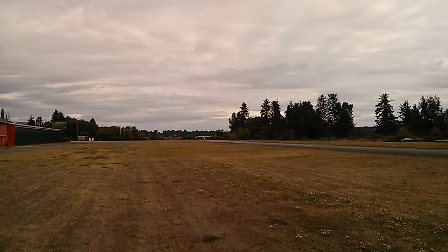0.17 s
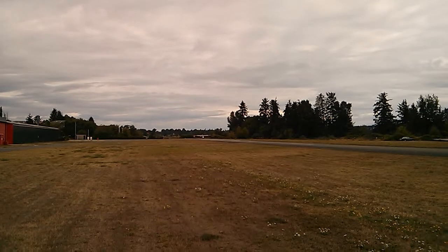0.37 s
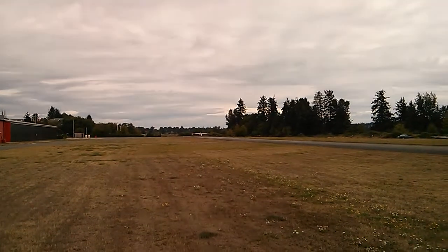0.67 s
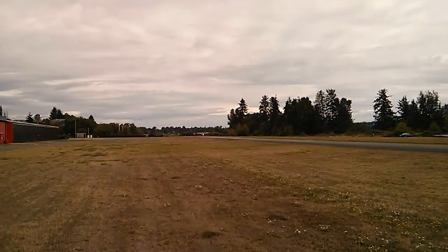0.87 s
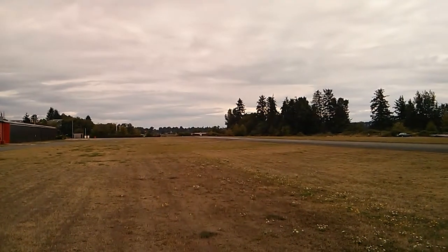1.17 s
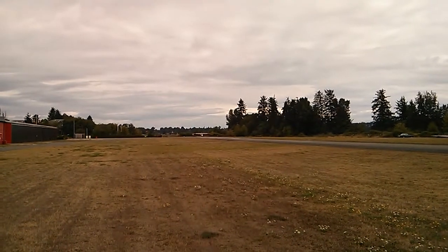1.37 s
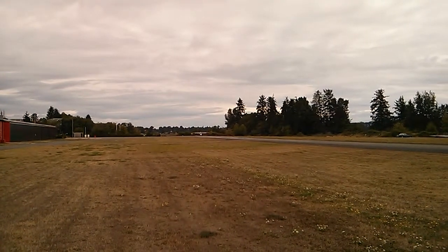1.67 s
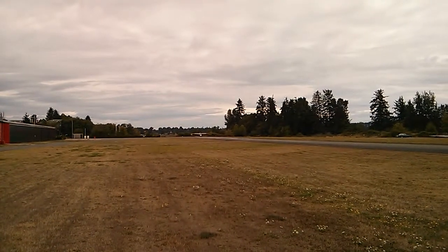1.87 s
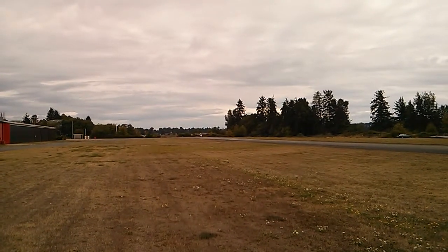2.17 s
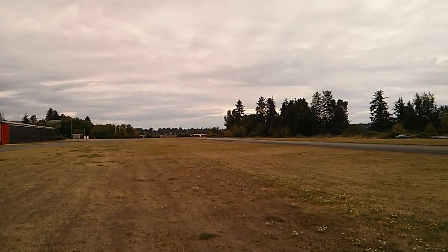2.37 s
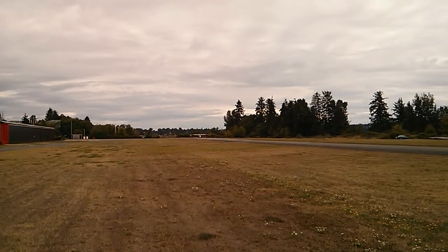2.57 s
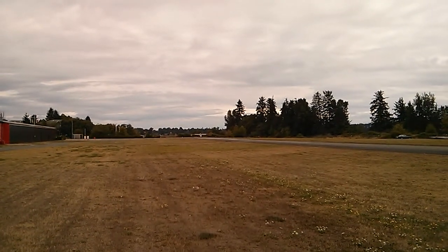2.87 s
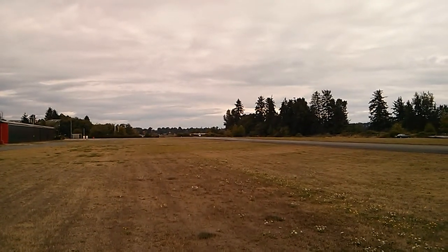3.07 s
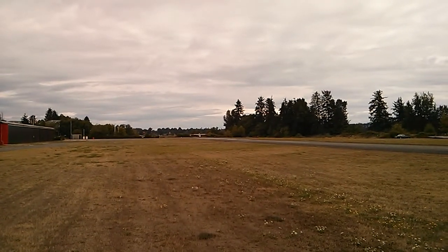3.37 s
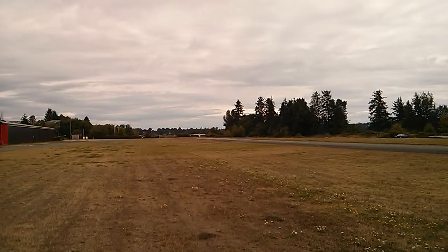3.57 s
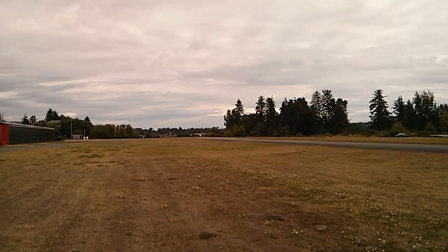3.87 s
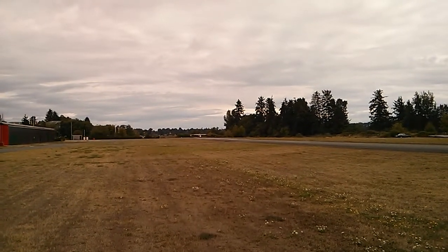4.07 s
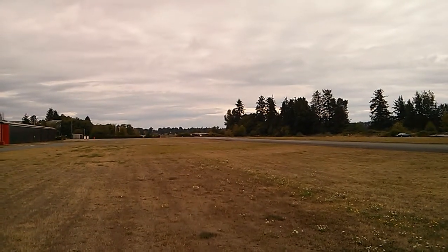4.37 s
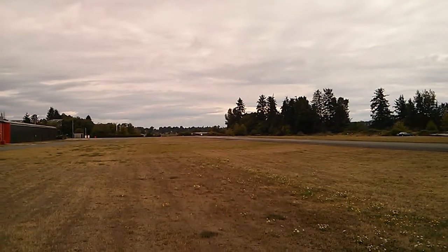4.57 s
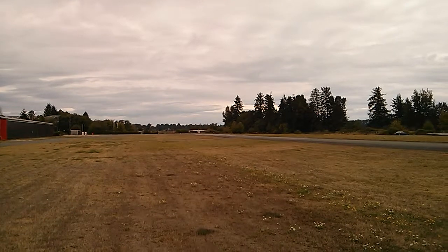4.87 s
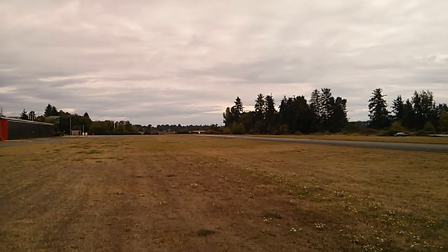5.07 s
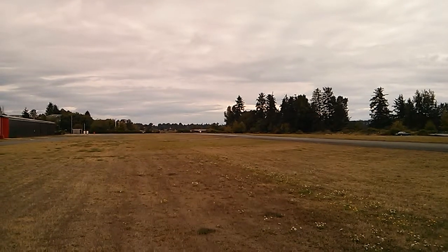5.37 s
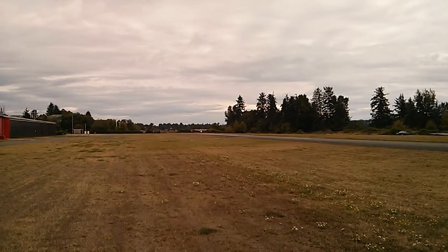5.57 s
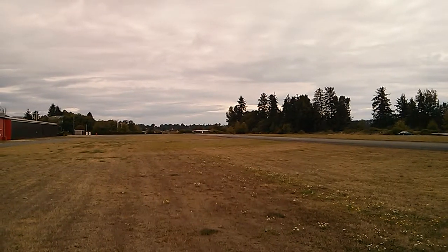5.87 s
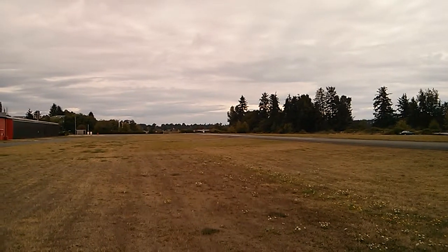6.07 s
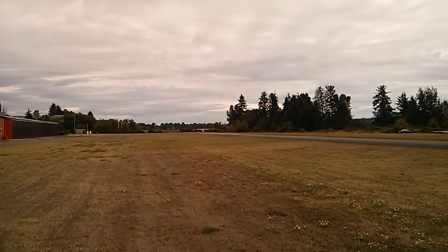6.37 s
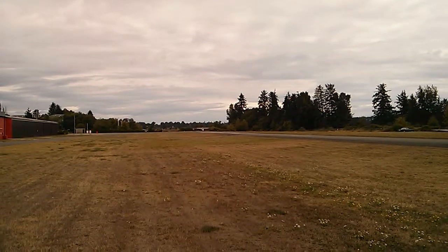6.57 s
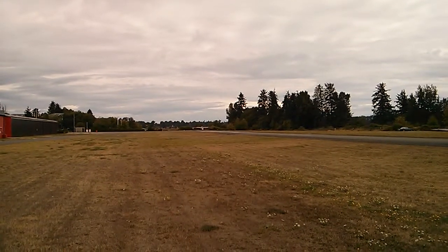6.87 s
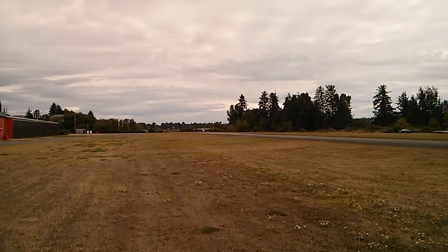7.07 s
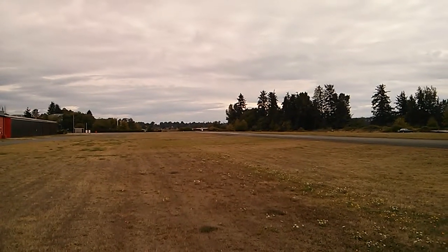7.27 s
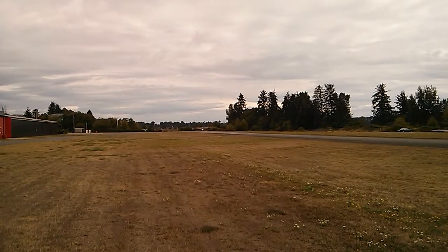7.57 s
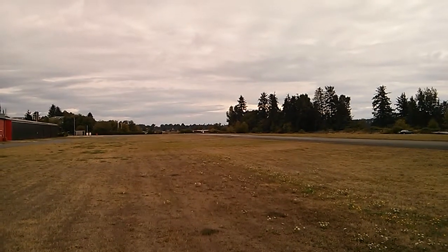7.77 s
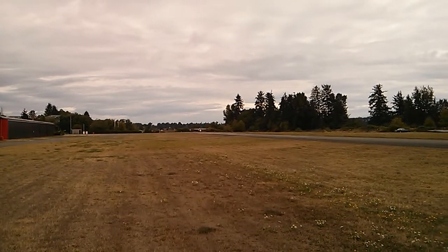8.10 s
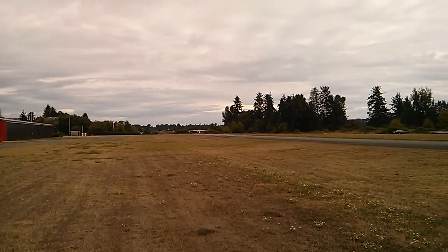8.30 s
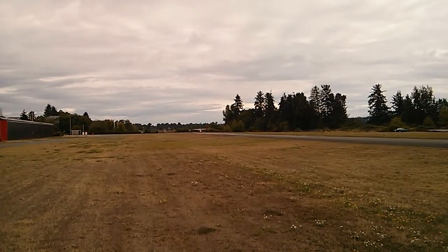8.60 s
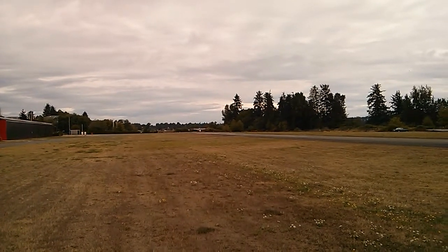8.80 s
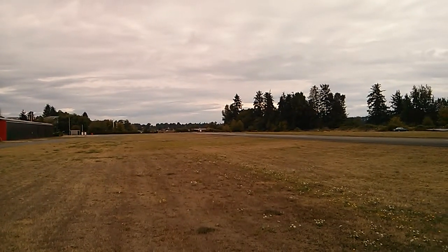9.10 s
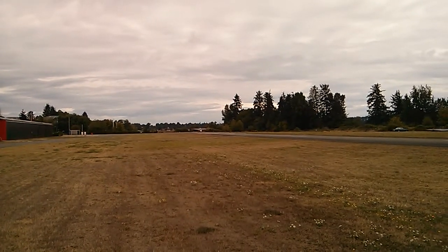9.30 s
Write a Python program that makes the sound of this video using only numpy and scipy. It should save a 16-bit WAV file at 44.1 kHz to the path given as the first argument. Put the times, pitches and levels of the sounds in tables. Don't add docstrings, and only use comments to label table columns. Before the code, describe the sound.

A small propeller aircraft idles unevenly on a grass airfield as crickets chirp, then its engine revs up to a loud, slapping full-power roar.

```python
import sys
import numpy as np
from scipy import signal
from scipy.fft import rfft, irfft, next_fast_len
from scipy.io import wavfile
from scipy.ndimage import uniform_filter1d

SR = 44100
rng = np.random.default_rng(int(sys.argv[2]) if len(sys.argv) > 2 else 0)


def dump_mix(stems):
    frames = np.atleast_2d(stems).T
    limited = np.clip(frames, -1, 1)
    pcm = np.round(limited * 32767).astype(np.int16)
    wavfile.write(sys.argv[1], SR, pcm)


def level_to_linear(level):
    exponent = np.asarray(level, float) / 20
    return 10 ** exponent


N = 416304
GEAR = .3846

# (time [s], firing rate [Hz])
SPEED = [(0.0, 58.4), (1.0, 61.1), (2.0, 59.1), (3.2, 60.8), (3.9, 59.8), (4.58, 61.2), (5.13, 77.5),
         (5.28, 80.1), (5.73, 93.5), (6.17, 103.8), (6.48, 120.8), (7.23, 158.6), (7.68, 194.5),
         (7.83, 201.8), (7.98, 205.9), (8.3, 209.9), (8.65, 211.0), (9.44, 211.7)]
# (firing rate [Hz], roar [dB], tip hiss [dB], fin ring [dB], rumble against the tones [dB])
SLIPSTREAM = [(57.4, -62.5, -86.5, -92, -7), (76.7, -57.5, -69.5, -64, -0.5),
              (95.3, -57.5, -70, -60.5, -14), (100, -52, -67, -60, -5.5), (115.4, -46.5, -61.5, -64, -9),
              (143, -41.5, -53, -58, -5), (165, -38, -48, -51, -9), (183, -34, -44.5, -52, -8.5),
              (202, -32.5, -42.5, -66, -24), (208.5, -32, -42, -50.5, -12)]
# (frequency [Hz], level [dB])
SLAP_COLOUR = [(260, -9), (450, -1.5), (486, -10), (639, 7.5), (740, 11), (907, 6.5), (1010, 3), (1290, 11),
               (1380, 6), (1470, 1.5), (1800, 4.5), (2070, -3.5), (2400, -12), (3120, -47), (5280, -120)]


def evened(x):
    return x / np.sqrt(np.mean(x ** 2) + 1e-20)


def read(points, hz):
    f, value = np.transpose(points)
    return np.interp(np.log(hz + 1), np.log(f + 1), value)


def curves(rows):
    s, *columns = np.transpose(rows)
    return [np.interp(np.arange(N) / SR, s, c) for c in columns]


def at_speed(rows, hz):
    speed, *columns = np.transpose(rows)
    return [np.interp(hz, speed, c) for c in columns]


def drift(hz, first=0):
    low_pass = signal.butter(2, hz, fs=SR / 64, output="sos")
    steps = evened(signal.sosfilt(low_pass, rng.standard_normal(N // 64 + 2)))
    return np.interp(np.arange(first, N) / 64, np.arange(len(steps)), steps)


def noise(colour, patchy_db, swell_db, size=1024):
    hop = size // 4
    frames, hz = N // hop + 5, np.fft.rfftfreq(size, 1 / SR)
    a, b, patches = rng.standard_normal((frames, len(hz), 3)).T
    patches = uniform_filter1d(patches, size=size // 100, axis=0)
    patches = evened(uniform_filter1d(patches, size=3000 // hop, axis=1))
    inside = (hz > colour[0][0]) & (hz < colour[-1][0])
    gain = level_to_linear(read(colour, hz)[:, None] + patchy_db * patches) * inside[:, None]
    rush = signal.istft((a + 1j * b) * gain, nperseg=size, noverlap=size - hop)[1][:N]
    return evened(rush) * level_to_linear(swell_db * drift(5.3))


def resonate(x, hz, width):
    r = np.exp(-np.pi * width / SR)
    return signal.lfilter([1 - r, 0, r - 1], [1, -2 * r * np.cos(2 * np.pi * hz / SR), r * r], x)


def ring(x, hz, width):
    return resonate(resonate(x, hz, width * 1.3), hz, width * 1.3)


def tone(turns, db, waver_db):
    return np.sqrt(2) * level_to_linear(db + waver_db * drift(13.6)) * np.cos(2 * np.pi * (turns + rng.random()))


def exhaust(turns, hz, first_db, second_db, third_db):
    # (multiple of the firing rate, level against the third [dB])
    upper_orders = [(4, -21.5), (5, -15.5)]
    # (frequency [Hz], gain [dB])
    muffler = [(40, -4), (310, 1), (350, -8), (500, -30)]
    orders = [(1, first_db), (2, second_db), (3, third_db)]
    orders += [(k, third_db + db + read(muffler, k * hz)) for k, db in upper_orders]
    return sum(tone(k * turns, db, waver_db=3.0) for k, db in orders)


def propeller(turns, hz, thump_db):
    # (multiple of the blade rate, level [dB])
    thump_orders = [(1, -6.5), (2, -1), (3, -11.5), (4, -16.5)]
    # (multiple of the firing rate, added multiple of the blade rate, level [dB])
    chopped_orders = [(.5, 0, -17), (.5, 1, -16.5), (.5, 2, -19.5), (1, 1, -14), (2.5, 0, -23.5)]
    blades = GEAR * turns
    thump = sum(tone(k * blades, thump_db + db, waver_db=2.0) for k, db in thump_orders)
    chopped = sum(tone(m * turns + k * blades, thump_db + db, waver_db=2.0) for m, k, db in chopped_orders)
    return thump + chopped + slap(blades, hz)


def rumble(level_db):
    # (frequency [Hz], level per Hz [dB])
    rumble_colour = [(25, -25), (50, -17), (80, 2), (150, 4), (220, -7), (300, -9), (350, -24.5),
                     (480, -43)]
    return level_to_linear(level_db) * noise(rumble_colour, patchy_db=2.4, swell_db=.6, size=4096)


def roar(hz, beat, level_db):
    # (frequency [Hz], level per Hz [dB])
    roar_colour = [(220, 11), (380, -9.5), (481, -13), (619, -0.5), (720, 5.5), (797, -13), (926, 7.5),
                   (1080, -7), (1260, 6.5), (1350, 0), (1500, -17.5), (1740, -12.5), (1940, -7.5),
                   (2350, -26), (2500, -51), (3250, -9), (5500, -120)]
    tips = np.clip((hz - 140) / 40, 0, 1)
    slow = np.sqrt(1 - tips) * noise(roar_colour[:-2], patchy_db=1.2, swell_db=.5)
    fast = np.sqrt(tips) * noise(SLAP_COLOUR, patchy_db=.8, swell_db=.2)
    return (slow + fast) * (1 + 0.45 * beat) * level_to_linear(level_db - 5.0 - 3.6 * tips)


def tip_hiss(hz, beat, level_db):
    # (frequency [Hz], level per Hz [dB])
    light_colour = [(1350, -48), (2300, -36), (2390, -13.5), (2950, -7), (3540, -11.5), (3930, -2),
                    (4580, -17.5), (4840, -30), (5380, -2), (5820, -10.5), (6730, -9), (14500, -25.5),
                    (16600, -31)]
    # (frequency [Hz], level per Hz [dB])
    full_colour = [(1350, -34), (2300, -49), (2470, -20), (2970, -2.5), (3190, -18), (3320, -11),
                   (3600, -7.5), (4090, -2.5), (4960, -5), (5330, -1.5), (6110, 3), (7900, -12.5),
                   (9420, -14), (11100, -35.5), (15600, -45)]
    # (frequency [Hz], width [Hz], level [dB])
    panel_modes = [(2660, 130, -11), (3066, 100, -9), (3327, 71, -4), (5490, 49, -5), (5990, 360, -1.5),
                   (8050, 86, -26)]
    power = np.clip((hz - 104) / 36, 0, 1)
    light = np.sqrt(1 - power) * noise(light_colour, patchy_db=3.5, swell_db=0.3, size=512)
    full = np.sqrt(power) * noise(full_colour, patchy_db=1.1, swell_db=0.57, size=512)
    gusts = rng.standard_normal((len(panel_modes), N))
    panels = evened(sum(level_to_linear(db) * evened(ring(gust, f, width))
                        for gust, (f, width, db) in zip(gusts, panel_modes)))
    return level_to_linear(level_db) * (light + full + level_to_linear(-11) * np.sqrt(power) * panels) * (1 + 0.23 * beat)


def cooling_fins(turns, level_db):
    # (frequency [Hz], width [Hz], level [dB])
    fin_modes = [(5500, 74, 3), (5265, 260, -0.5), (5940, 140, -11)]
    blows = level_to_linear(2.1 * np.clip(rng.standard_normal(N), -2, 2) + 2.4 * drift(2.4))
    knocks = np.diff(np.floor(turns), prepend=0) * blows + 0.022 * rng.standard_normal(N)
    fins = evened(sum(level_to_linear(db) * evened(ring(knocks, f, width)) for f, width, db in fin_modes))
    return level_to_linear(level_db - 4.5) * fins


def airflow(turns, hz, tones_db, effort_db):
    # (level [dB], ..)
    gust_sizes = (0.58, 0.4, 1.9, 2.8)
    gusty = [db + size_db * drift(7.2) for db, size_db in zip(at_speed(SLIPSTREAM, hz), gust_sizes)]
    roar_db, hiss_db, fins_db, rumble_db = gusty
    roar_db = roar_db + 0.42 * effort_db
    beat = uniform_filter1d(2 * np.exp(-3.0 * (GEAR * turns % 1)) - .6, size=60)
    air = rumble(tones_db + rumble_db) + roar(hz, beat, roar_db) + tip_hiss(hz, beat, hiss_db)
    return air + cooling_fins(turns, fins_db)


def idle_rush():
    # (frequency [Hz], level per Hz [dB])
    idle_colour = [(190, -69), (330, -13), (365, -55), (433, -0.5), (508, -32.5), (655, 9), (797, -44),
                   (838, -7), (889, 19), (936, -6), (1040, -54), (1220, -7), (1580, -9.5), (1840, -4),
                   (2500, -27.5), (3250, -45), (5500, -120)]
    return level_to_linear(-65.5) * noise(idle_colour[:-2], patchy_db=1.6, swell_db=.7)


def aircraft():
    # (time [s], level [dB])
    effort = [(0.0, 1), (0.45, -2.5), (0.95, 1), (1.45, -0.5), (1.9, 1.2), (2.4, 0.2), (3.2, 0.7),
              (3.9, 0.8), (4.55, 1.5), (4.9, -3.2), (5.36, 1.5), (5.6, 2.5), (5.9, -0.5), (6.5, 1.2),
              (7.4, -2.5), (8.0, -0.1), (8.8, -1.2), (9.44, 1.7)]
    # (time [s], half length [s], level [dB])
    misfires = [
        (0.008, 0.04, -3),
        (0.268, .06, -5.5),
        (0.502, 0.032, -1.5),
        (1.28, 0.021, -15),
        (1.684, 0.019, -17),
        (1.93, 0.07, -4),
        (4.708, 0.04, -6),
        (5.536, 0.038, -12),
    ]
    # (firing rate [Hz], exhaust order 1 [dB], order 2 [dB], order 3 [dB], propeller thump [dB])
    engine = [(66, -66, -57.5, -54.5, -70), (68.4, -75, -53.5, -50, -74), (70.7, -65, -47.5, -59.5, -67),
              (92.2, -58.5, -47.5, -60.5, -69), (96.5, -70.5, -56, -62.5, -66), (120, -60, -53, -75.5, -60),
              (134, -44.5, -51, -85, -56.5), (159.4, -35.5, -47, -65, -42), (201, -30, -51.5, -52, -33),
              (205.4, -33.5, -53, -39, -34), (210, -37, -49, -81, -38.5)]
    (hz,), (effort_db,) = curves(SPEED), curves(effort)
    t = np.arange(N) / SR
    effort_db = effort_db + sum(db * np.exp(-((t - s) / half) ** 2) for s, half, db in misfires)
    levels = [db + effort_db for db in at_speed(engine, hz)]
    first_db, second_db, third_db, thump_db = levels
    turns = np.cumsum(hz + .2 * drift(4)) / SR
    tones_db = 10 * np.log10(sum(level_to_linear(2 * db) for db in levels))
    direct = exhaust(turns, hz, first_db, second_db, third_db) + propeller(turns, hz, thump_db)
    direct += airflow(turns, hz, tones_db, effort_db) + idle_rush()
    return wall_echo(direct)


def field_hiss():
    # (frequency [Hz], level per Hz [dB])
    field_colour = [(1350, -39), (2300, -37), (2390, -5), (3490, -24), (4580, 4), (5210, -0.5),
                    (14700, -6.5), (15600, -6)]
    wash_db = 0.25 * np.maximum(at_speed(SLIPSTREAM, *curves(SPEED))[1] + 72, 0)
    return level_to_linear(-75.5 + wash_db) * noise(field_colour, patchy_db=2.0, swell_db=0.36, size=512)


def ticks():
    # (time [s], level [dB], frequency [Hz], decay [s])
    creaks = [
        (.04, -63, 6240, 0.024),
        (.253, -57, 8000, .002),
        (1.527, -60, 8500, .002),
        (2.037, -61, 7700, 0.036),
        (2.81, -67, 8040, .002),
        (3.32, -77, 9000, 0.061),
        (3.79, -63, 9000, .003),
        (4.095, -66, 7050, .003),
    ]
    # (time [s], level [dB])
    rattle = [(4.8832, -50), (4.9705, -51), (5.079, -46), (5.1316, -68), (5.2354, -47), (5.286, -44),
              (5.3465, -43), (5.398, -47), (5.4349, -46), (5.4793, -49), (5.5522, -76), (5.5981, -50)]
    out, t = np.zeros(N), np.arange(6000) / SR
    for s, db, hz, decay in creaks + [(s, db - 8, 5740, 0.019) for s, db in rattle]:
        burst = rng.standard_normal(len(t)) * np.exp(-t / decay) * np.minimum(t / decay * 4, 1)
        out[round(s * SR):][:len(t)] += level_to_linear(db) * (0.59 * ring(burst, hz, 3900) + 2.5 * ring(burst, hz, 600))
    return out


def wall_echo(direct):
    # (frequency [Hz], reflected share, negative is upside down)
    wall = [(40, -0.98), (350, -0.55), (600, 0.19), (2000, -0.33), (4000, -0.29)]
    delay_s = .0469
    size = next_fast_len(N + SR)
    f = np.fft.rfftfreq(size, 1 / SR)
    echo = read(wall, f) * np.exp(-2j * np.pi * f * delay_s)
    return irfft(rfft(direct, size) * (1 + echo), size)[:N]


def crickets():
    # (time [s], first to last stroke [s], peak level [dB])
    near_chirps = [(0.062, 0.11, -59), (.57, 0.096, -59.5), (1.064, .102, -59), (1.635, 0.099, -58.5),
                   (2.155, 0.097, -57.5), (2.625, .098, -58), (3.1993, 0.099, -58.5), (3.79, 0.095, -58.5),
                   (4.312, .1, -57.5), (4.884, 0.096, -58), (5.649, .096, -56), (6.274, .106, -58),
                   (6.715, .108, -55)]
    # (level [dB], frequency [Hz])
    wing_strokes = [(-6, 4460), (-0.8, 4560), (-0.1, 4570)]
    # (time [s], peak level [dB], frequency [Hz])
    far_chirps = [(0.3194, -69, 5500), (0.4294, -70, 5100), (0.5487, -67, 4670), (0.6, -69, 4540),
                  (0.7153, -68, 4890), (0.9592, -64, 4630), (1.0084, -68, 4640), (1.1164, -66, 4500),
                  (1.2126, -66, 5500), (1.3054, -70, 5450), (1.3478, -67, 5450), (1.8447, -70, 4600),
                  (1.935, -76, 4850), (1.9804, -64, 4880), (2.0428, -69, 4870), (2.7801, -68, 5040),
                  (3.3154, -69, 4970), (3.4394, -67, 4650), (3.5793, -72, 5430), (4.2787, -66, 4670),
                  (4.6249, -62.5, 4560), (4.6753, -64, 4710), (4.7212, -64, 5130), (5.5324, -70, 5460)]
    near, far = np.zeros((2, N + SR))
    strokes = [(far, *row, .026, .015) for row in far_chirps]
    for s, span, top_db in near_chirps:
        for late, (db, hz) in zip((0, .0455, span), wing_strokes):
            strokes.append((near, s + late, top_db + db, hz, .029, .1))
    for out, s, db, hz, length, sag in strokes:
        u = np.arange(0, 1.2, 1 / (length * SR))
        shape = np.sin(np.pi * (u / 1.17) ** 0.94) ** 2
        at = max(round((s + 0.013 - 0.81 * length) * SR), 0)
        pitch = hz * (1.012 - sag * u ** 3.4)
        out[at:at + len(u)] += level_to_linear(db) * shape * np.sin(2 * np.pi * np.cumsum(pitch) / SR)
    flutter = evened(0.92 + evened(uniform_filter1d(rng.standard_normal(N + SR), size=50)))
    tail = rng.standard_normal(12000) * level_to_linear(-60 * np.arange(12000) / SR / .5)
    smear = signal.oaconvolve((near + 1.4 * far) * flutter, tail / np.linalg.norm(tail))
    return (near + far * (0.33 + 0.53 * flutter) + level_to_linear(-7.5) * smear[:N + SR])[:N]


def slap(blades, hz):
    # (time [s], slap [dB], brightness [dB])
    tip_loading = [
        (6.7, -45, -8),
        (7.15, -47.5, .5),
        (7.32, -38, -1.4),
        (7.5, -37.5, 0),
        (7.7, -36.5, 0.5),
        (8.25, -35.5, -2.5),
        (8.6, -31.5, -7.5),
        (9.03, -38.5, 3.5),
        (9.44, -35.5, 4.5),
    ]
    level_db, bright_db = curves(tip_loading)
    start = round(6.93 * SR)
    hz, bright_db = hz[start:], bright_db[start:] - 1.5
    turns, rate = blades[start:], GEAR * hz
    below_free = np.maximum(216 - hz, 0)
    stack = np.zeros(len(turns))
    for k in range(6, 28):
        f = k * rate
        tilt_db = bright_db * np.clip((f - 1040) / 200, 0, 1)
        tilt_db += 0.1471 * below_free * np.exp(-((f - 1020) / 178) ** 2)
        waver_db = (2.5 + 0.028 * k) * drift(1.66, first=start)
        line_db = read(SLAP_COLOUR, f) + tilt_db - 1.4 * max(k - 22, 0) + waver_db
        jitter = 0.0064 * k * drift(6.4, first=start)
        stack += level_to_linear(line_db) * (f > 440) * np.sin(2 * np.pi * (k * turns + jitter))
    strength = rng.standard_normal(int(blades[-1]) + 2)
    strength = uniform_filter1d(strength[np.round(turns).astype(int)], size=100)
    stack *= level_to_linear((1.0 + 0.015 * (220 - hz)) * strength)
    meeting = uniform_filter1d(np.cos(2 * np.pi * np.round(turns) / GEAR), size=100)
    stack *= level_to_linear(0.1034 * below_free * meeting)
    tips_db = level_db[start:] + 2.0 - 0.18 * (212 - hz)
    fade = np.minimum(np.arange(len(turns)) / SR / 0.33, 1)
    return np.pad(fade * level_to_linear(tips_db) * stack / np.std(stack[-SR:]), (start, 0))


def scene():
    return (aircraft() + field_hiss() + ticks() + crickets())[None]


def top_cut(x):
    return signal.sosfilt(signal.butter(12, 15750, fs=SR, output="sos"), x)


def record(dry):
    stop = np.minimum(np.arange(N)[::-1] / 200, 1)
    return top_cut(dry * stop)


dry = scene()
out = record(dry)
dump_mix(out)
```